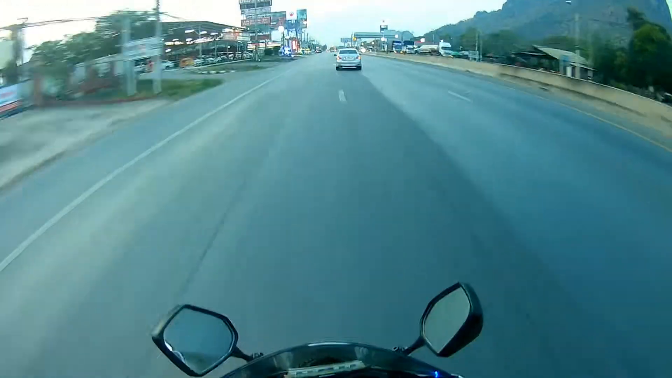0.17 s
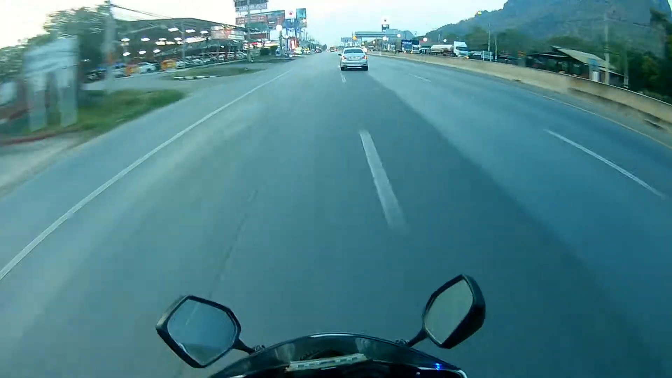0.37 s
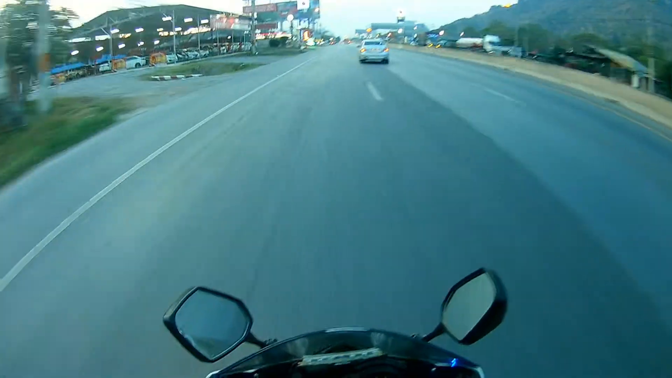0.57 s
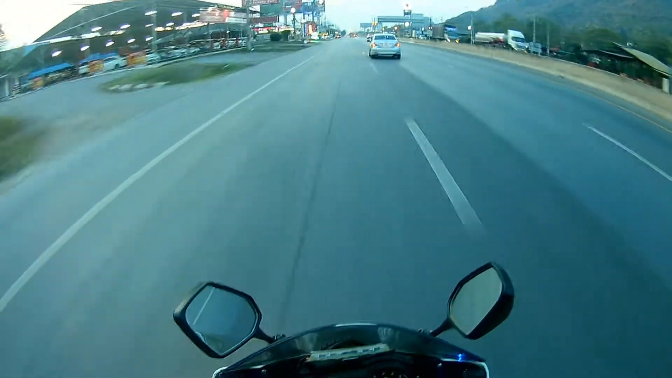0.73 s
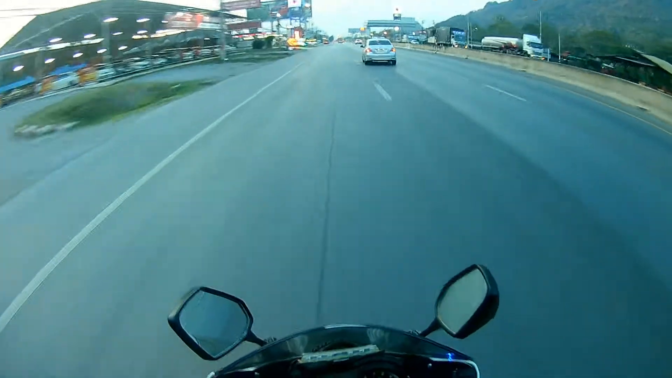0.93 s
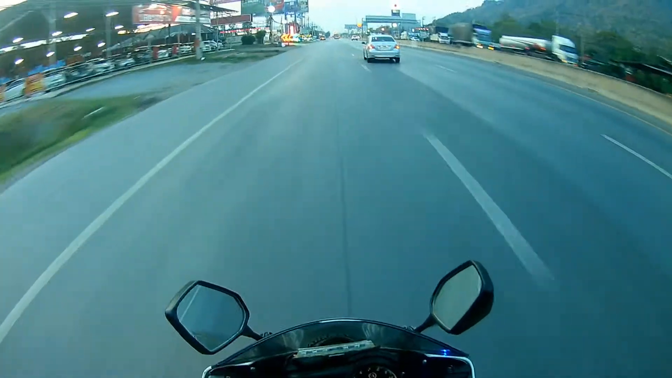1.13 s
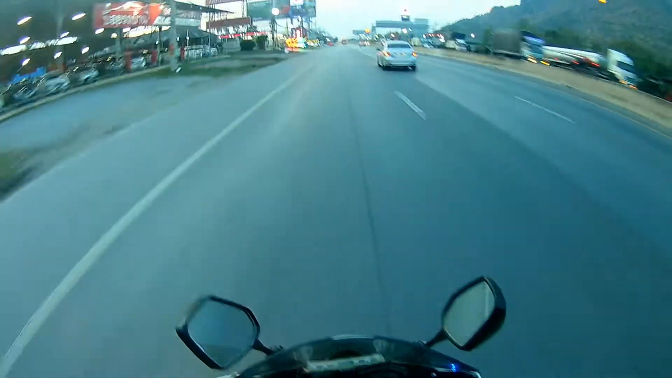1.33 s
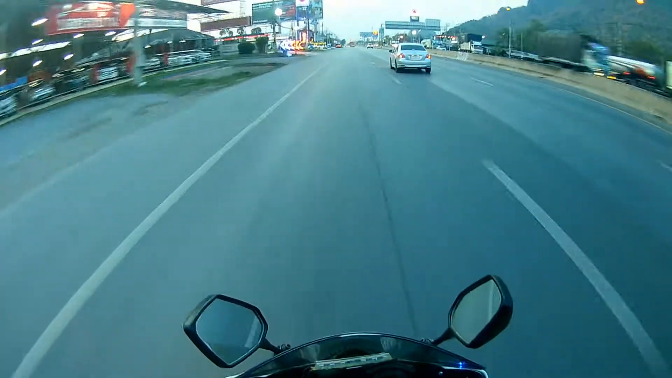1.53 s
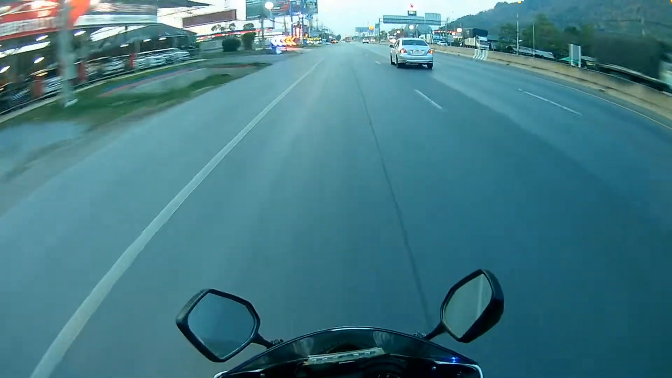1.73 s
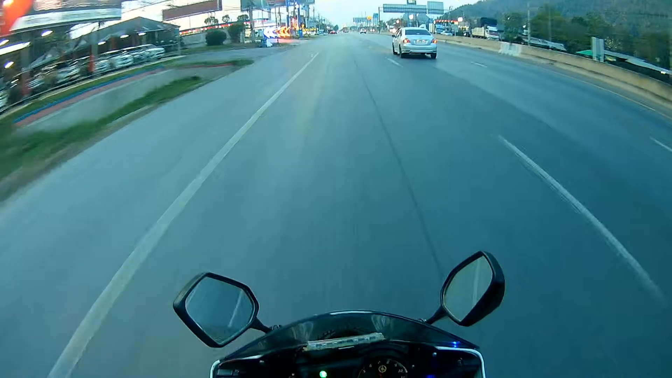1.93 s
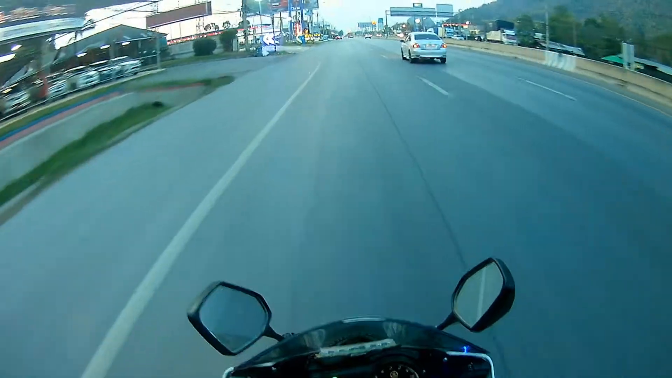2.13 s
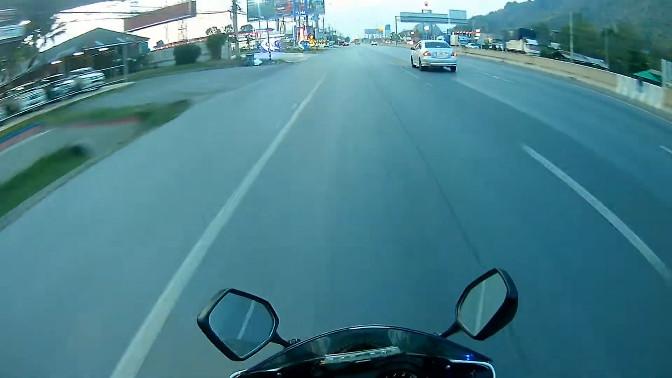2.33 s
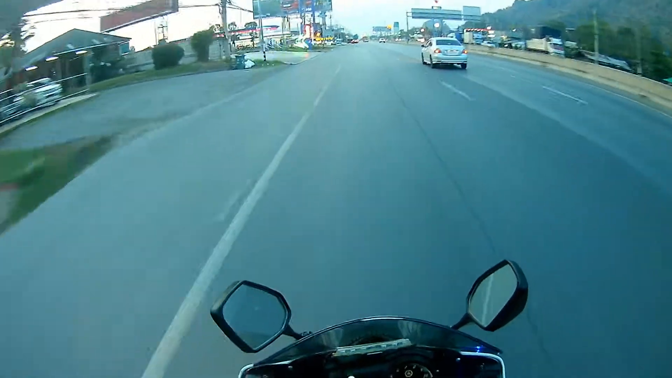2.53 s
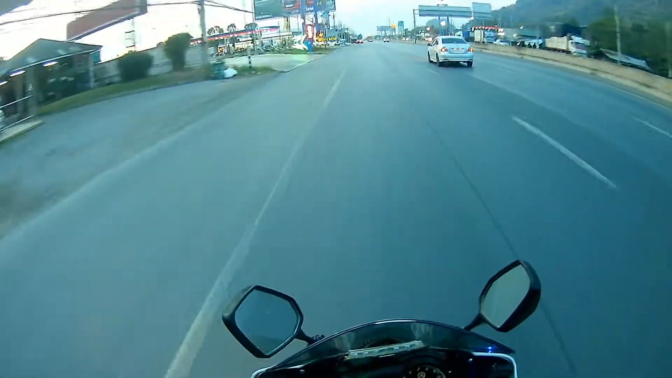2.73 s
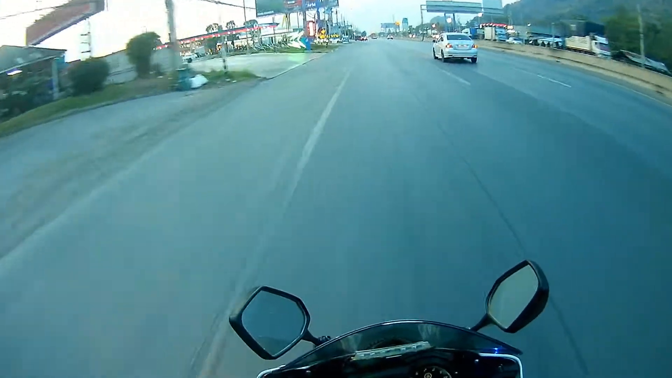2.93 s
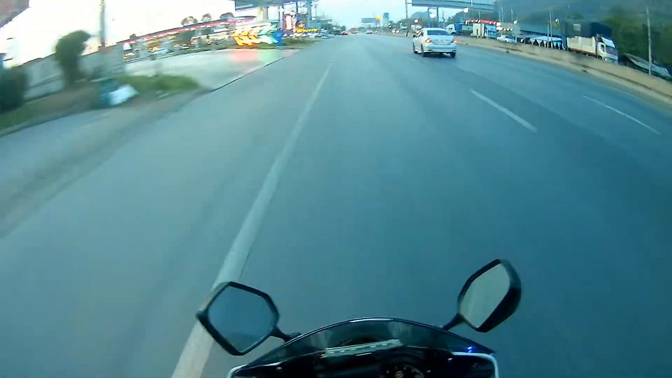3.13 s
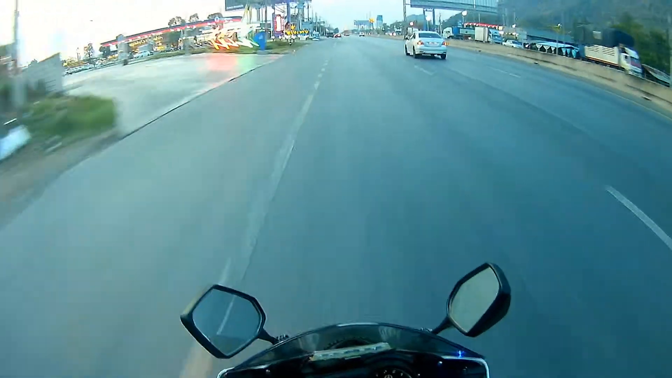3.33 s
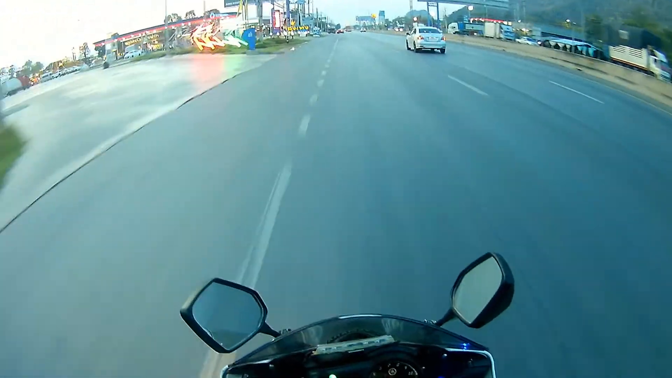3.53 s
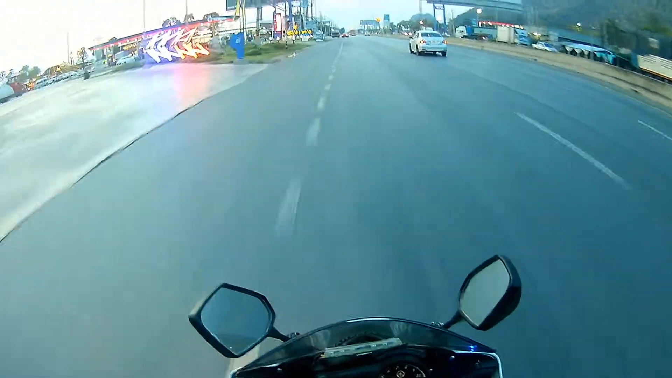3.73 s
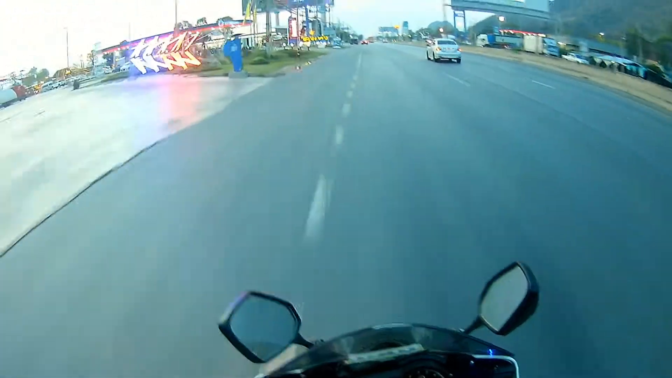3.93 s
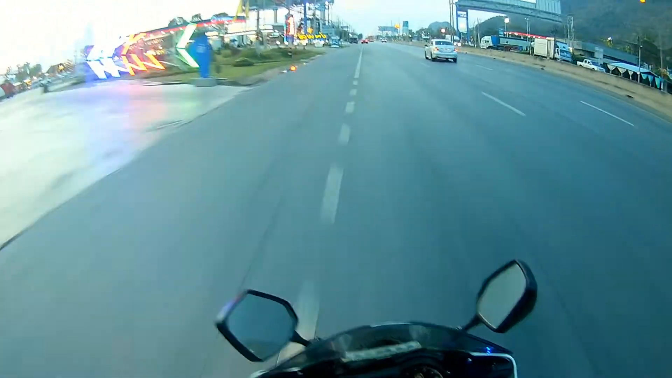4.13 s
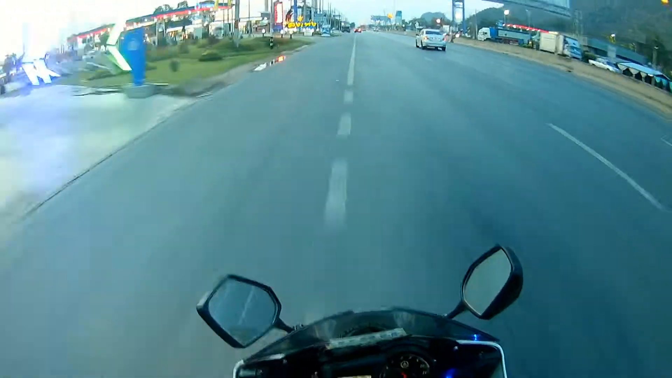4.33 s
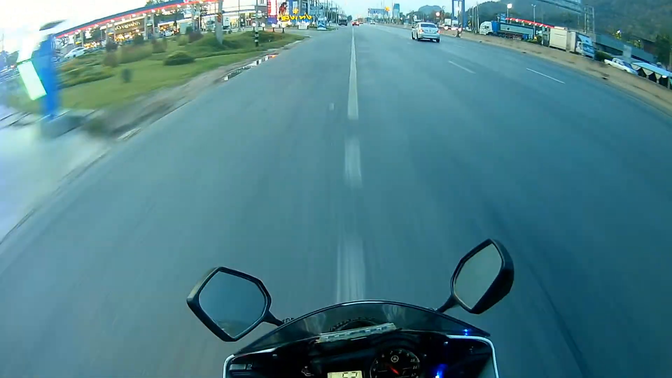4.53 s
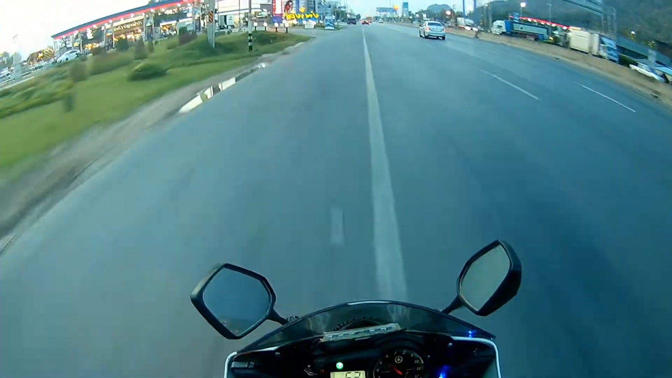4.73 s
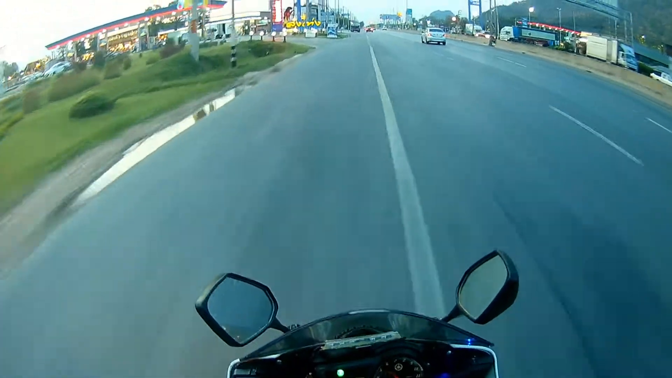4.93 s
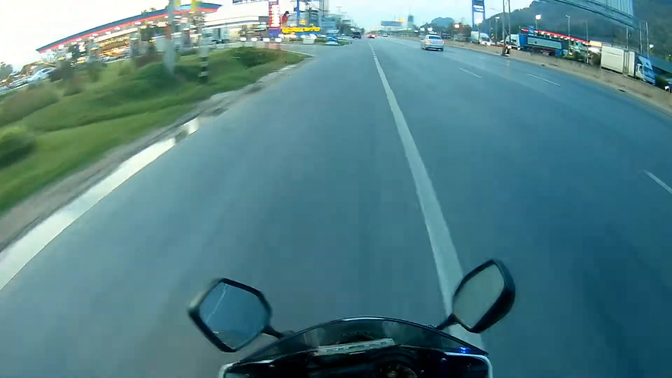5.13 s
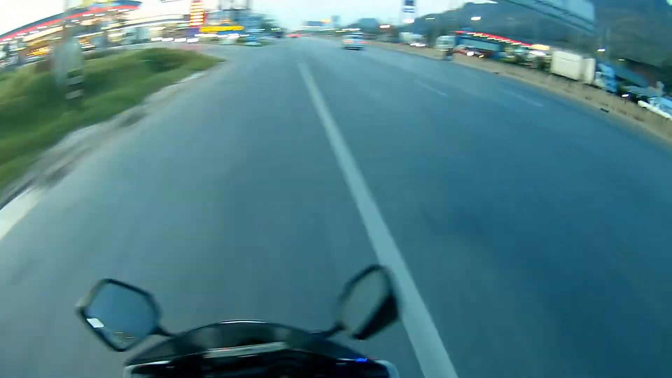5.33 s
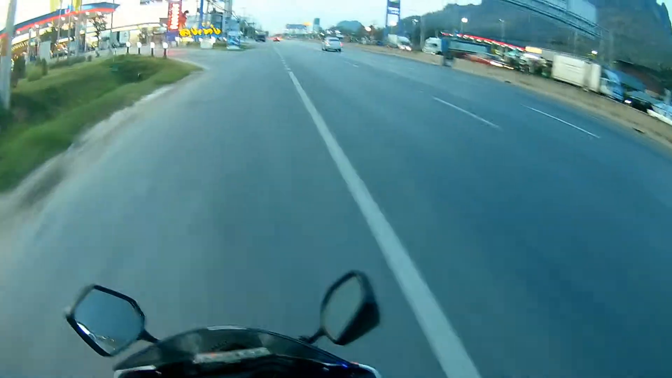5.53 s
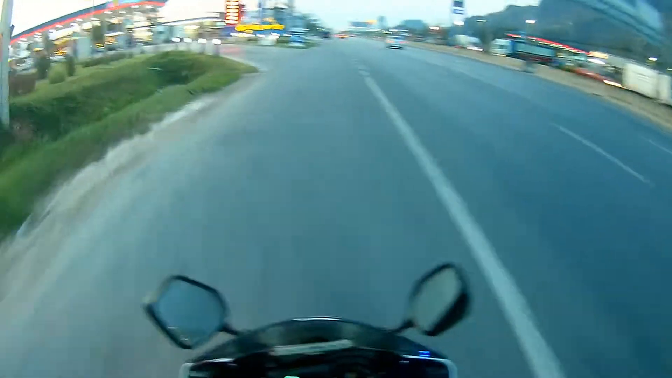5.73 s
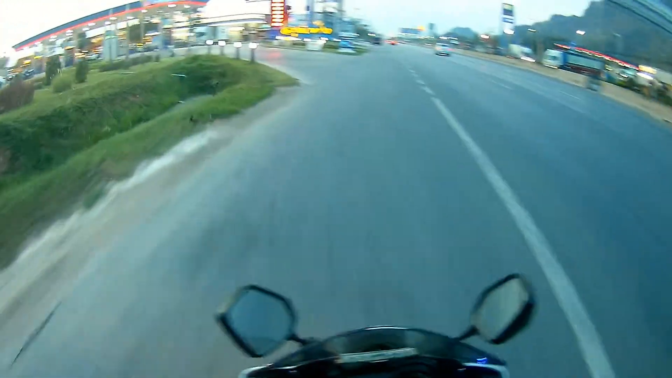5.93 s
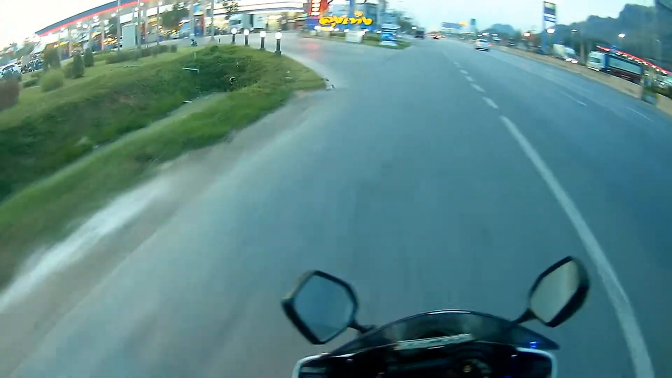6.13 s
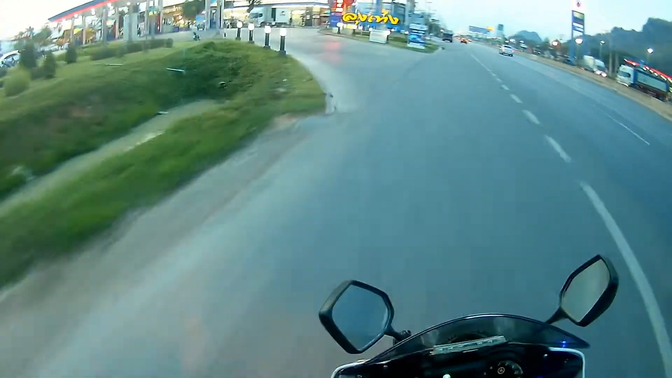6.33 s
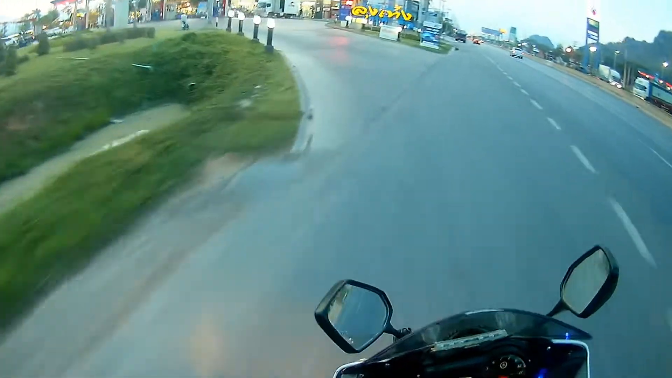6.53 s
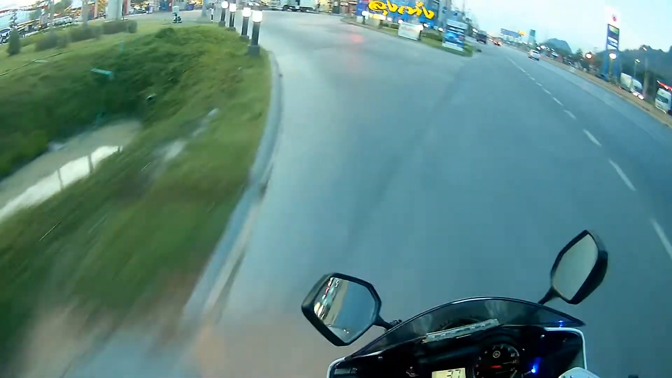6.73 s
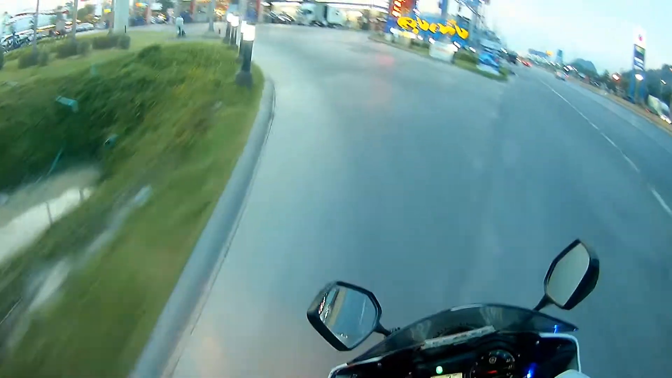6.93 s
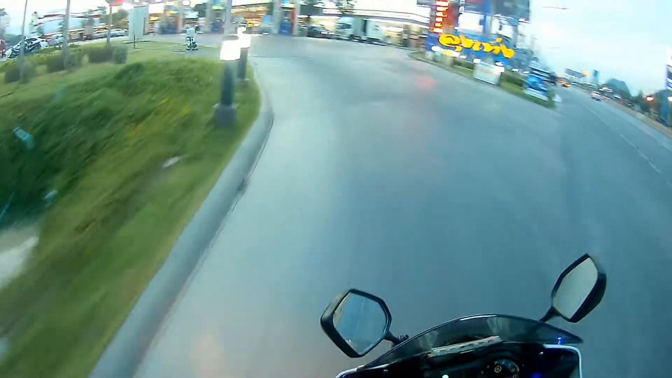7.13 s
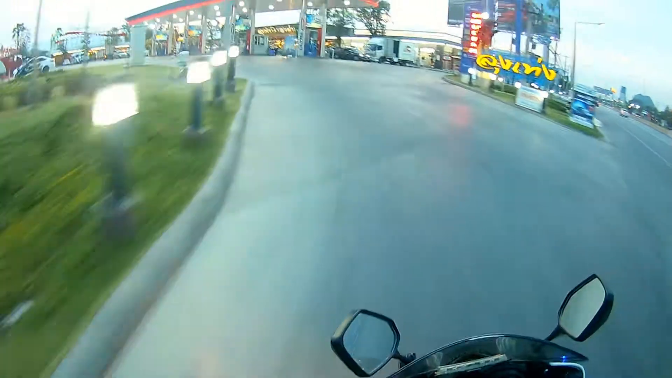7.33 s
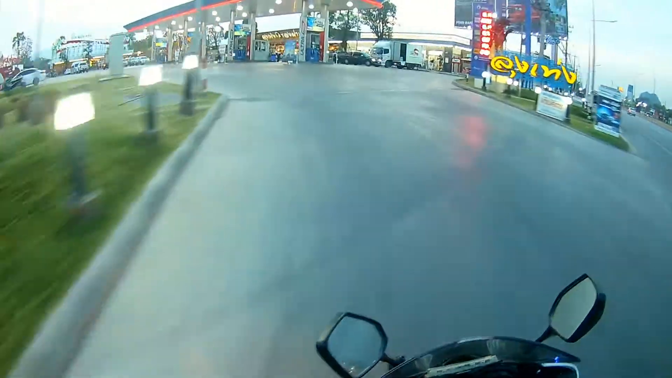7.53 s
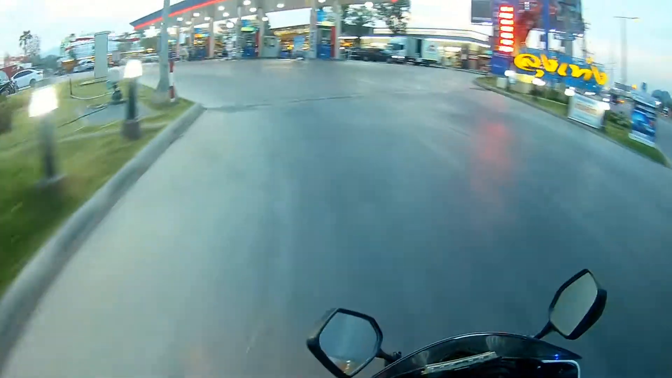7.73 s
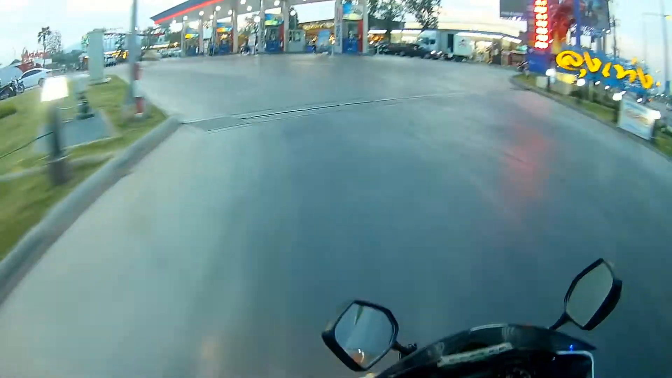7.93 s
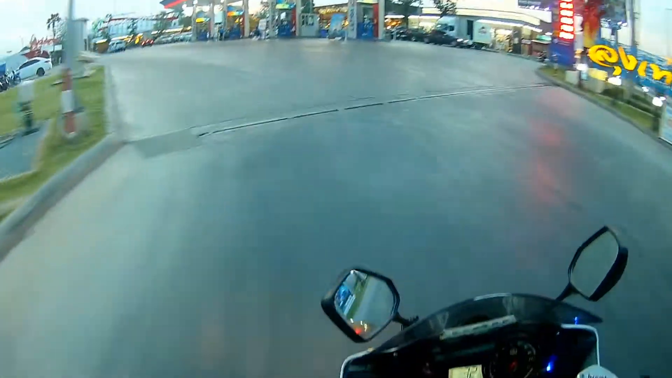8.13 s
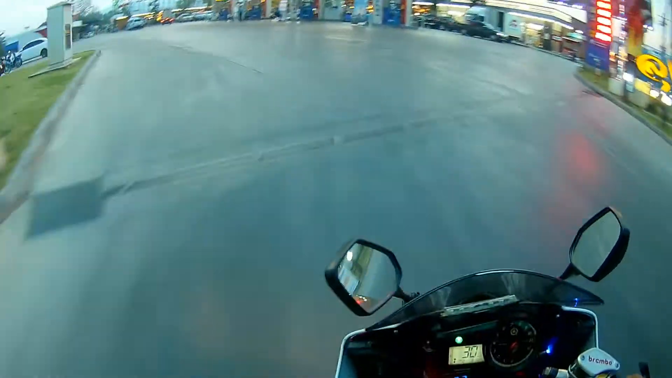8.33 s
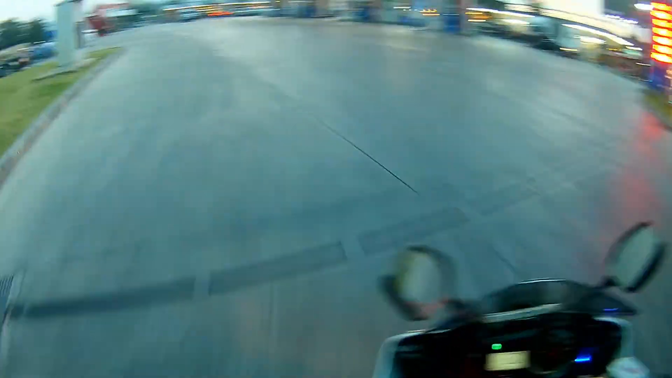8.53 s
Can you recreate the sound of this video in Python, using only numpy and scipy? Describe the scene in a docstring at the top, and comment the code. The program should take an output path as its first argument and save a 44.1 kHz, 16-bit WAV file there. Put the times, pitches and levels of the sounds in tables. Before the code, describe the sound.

A single-cylinder motorcycle decelerates on a highway, heard from a plastic-cased camera worn by the rider. Strong wind and tyre rush cover a fast exhaust drone and chain clatter. The pitch sags, jumps up at three downshifts with short rough throttle growls, and sags again. Small metallic knocks follow, the wind dies away, and the bike rolls onto a forecourt at a low, slow idle.

```python
"""A single-cylinder four-stroke motorcycle slows from highway speed, changes down three times and rolls on at idle.
Each firing strikes the resonances of the silencer and pipe, and a puff of gas noise follows it.
The intake drones at high revs, valve gear and chain clatter, and wind noise dies away with the speed.
A few short rough bursts of low noise, narrow notes and small knocks are added.
The plastic housing of a camera worn by the rider colours the clatter, the wind rush and the knocks."""
import sys
import numpy as np
from scipy import signal
from scipy.fft import rfft, irfft
from scipy.io import wavfile
from scipy.ndimage import uniform_filter1d

SR = 44100
rng = np.random.default_rng(int(sys.argv[2]) if len(sys.argv) > 2 else 0)


def generate_wav(sig):
    """Save sig (samples, or channels by samples) to the path in sys.argv[1] as 16-bit PCM at SR."""
    pcm = np.round(np.clip(np.atleast_2d(sig).T, -1, 1) * 32767).astype(np.int16)
    wavfile.write(sys.argv[1], SR, pcm)


N = 378378
TIME = np.arange(N) / SR  # seconds
SIZE = 2 ** 19  # samples in a Fourier transform, longer than the sound
FREQ = np.maximum(np.arange(SIZE // 2 + 1) * SR / SIZE, 1)  # Hz
CRUISE_HZ = 60  # firings per second at which several levels are given


def undb(db):
    """Turn decibels into gain."""
    return 10 ** (np.asarray(db) / 20)


def curve(table, at):
    """Read a table of times and values at the given times, with straight lines between its rows."""
    seconds, values = np.transpose(table)
    return np.interp(at, seconds, values)


def swell(at, middle_s, half_s):
    """A bell-shaped swell of height 1 that is down to half at half_s from its middle."""
    return .5 ** (((at - middle_s) / half_s) ** 2)


def spectrum(points):
    """Draw a spectrum in dB through the given points, on a logarithmic pitch scale."""
    hz, db = np.transpose(points)
    return np.interp(np.log(FREQ), np.log(hz), db)


def resonance(hz, width_hz):
    """A resonance with steep sides, as a spectrum in dB."""
    detune = (FREQ / hz - hz / FREQ) * hz / width_hz
    return np.maximum(-20 * np.log10(1 + detune ** 2), -100)


def colour(x, db, size=N):
    """Filter with a spectrum in dB; the result rings after a blow, never before it."""
    # folding the cepstrum onto positive times gives the minimum-phase filter
    cepstrum = irfft(np.log(undb(db)))[:SIZE // 2]
    cepstrum[1:] *= 2
    response = np.exp(rfft(cepstrum, SIZE))
    return irfft(rfft(x, SIZE) * response)[:size]


def unit(x, band=(0, SR)):
    """Scale a sound so that its rms within a band (Hz) is 1."""
    inside = rfft(x, SIZE)[(FREQ >= band[0]) & (FREQ <= band[1])]
    power = 2 * np.sum(abs(inside) ** 2) / SIZE / N
    return x / np.sqrt(power)


def walk(rate):
    """Random levels, drawn rate times a second and smoothed twice, with a spread of 1."""
    step = int(SR / rate)
    held = rng.standard_normal(2000)[np.arange(N) // step]
    slow = uniform_filter1d(uniform_filter1d(held, step), step)
    return slow / slow.std()


def clicks(times, sizes):
    """Single clicks at the given times, each shared between the two nearest samples."""
    at = np.ravel(times) * SR
    keep = (at >= 0) & (at < SIZE - 1)
    at, sizes = at[keep], np.ravel(sizes)[keep]
    before = at.astype(int)
    late = at - before
    return np.bincount(before, sizes * (1 - late), SIZE) + np.bincount(before + 1, sizes * late, SIZE)


# Resonances and dips of the camera's plastic housing.
# Each row: centre in Hz, width in Hz, height in dB (below zero for a dip).
HOUSING_RESONANCES = [(838, 102, 2), (1272, 150, 3.5), (1815, 380, 8.5), (2800, 210, 2), (2990, 420, -3),
                      (3934, 550, 8.5), (4470, 250, -3), (5027, 810, 9), (7370, 2500, 5.5),
                      (9520, 630, -39)]


def housing():
    """The plastic housing boosts some pitches and dulls others; returned as a spectrum in dB."""
    return sum(db * .5 ** ((2 * (FREQ - hz) / width) ** 2) for hz, width, db in HOUSING_RESONANCES)


# How each gear drags the revs up, holds them, then lets them sag.
# Each row: start in seconds, clutch slip in seconds, top firings per second, hold in seconds, sag in Hz per second.
GEAR_CHANGES = [(0, .05, 75.55, 0, 7.7), (2.36, .12, 63.81, .28, 19), (3.28, .42, 62.92, 0.0095, 11.8),
                (5.09, .13, 52.61, .2, 13.8)]
LOWEST_IN_GEAR_HZ = 35.8  # firings per second
# once the clutch is pulled, the revs settle towards idle and keep sinking slowly
CLUTCH_S, IDLE_HZ, SETTLE_S, IDLE_SAG_HZ_PER_S = 6.883, 22.43, .354, 3.87


def revs():
    """Firings per second: down through the gears, then a fall to idle."""
    hz = np.full(N, float(GEAR_CHANGES[0][2]))
    for start, slip_s, top_hz, hold_s, sag_hz_per_s in GEAR_CHANGES:
        since = TIME - start
        hz_before = np.interp(start, TIME, hz)
        rise = np.interp(since, [0, slip_s], [hz_before, top_hz])
        sag = sag_hz_per_s * np.maximum(since - slip_s - hold_s, 0)
        hz = np.where(since < 0, hz, rise - sag)
    free_s = np.maximum(TIME - CLUTCH_S, 0)
    settling = (LOWEST_IN_GEAR_HZ - IDLE_HZ) * np.exp(-free_s / SETTLE_S)
    idle = IDLE_HZ + settling - IDLE_SAG_HZ_PER_S * free_s
    return np.where(free_s > 0, idle, np.maximum(hz, LOWEST_IN_GEAR_HZ))


# in gear: boom fades above cruising revs, bark fades below its knee
BOOM_DB, BOOM_FADE_DB_PER_HZ = 9, 0.7
BARK_DB, BARK_KNEE_HZ, BARK_FADE_DB_PER_HZ = 9.3, 55, .55
# at idle, approached over about UNLOAD_S seconds after the clutch is pulled
IDLE_BOOM_DB, IDLE_BARK_DB, IDLE_CHUFF_DB, UNLOAD_S = 4.7, 1.6, 3.2, .2
# added at full throttle, trading boom for bark
THROTTLE_BOOM_DB, THROTTLE_BARK_DB = -4.5, 8


def strengths(times, hz):
    """Boom, bark and chuff of each firing in dB: revs and throttle favour the bark, idling the deep chuff."""
    idling = 1 - np.exp(-np.maximum(times - CLUTCH_S, 0) ** 2 / UNLOAD_S ** 2)
    throttle = sum(opening * swell(times, s, half_s) for s, half_s, _, _, opening in ROUGH_BURSTS)
    boom_db = BOOM_DB - BOOM_FADE_DB_PER_HZ * np.maximum(hz - CRUISE_HZ, 0)
    boom_db = boom_db + idling * (IDLE_BOOM_DB - boom_db) + THROTTLE_BOOM_DB * throttle
    bark_db = BARK_DB - BARK_FADE_DB_PER_HZ * np.maximum(BARK_KNEE_HZ - hz, 0)
    bark_db = bark_db + idling * (IDLE_BARK_DB - bark_db) + THROTTLE_BARK_DB * throttle
    chuff_db = IDLE_CHUFF_DB + 20 * np.log10(np.maximum(idling, .2))
    return boom_db, bark_db, chuff_db


def stumble(number, times, from_s=7.28, to_s=7.76, poor_db=4.5, rebound_db=.8):
    """On the way down to idle every second charge burns poorly and the next strongly; dB of weakening."""
    return np.where(number % 2, poor_db, -rebound_db) * ((times > from_s) & (times < to_s))


# Spectrum of the silencer, which booms near 160 Hz. Each row: pitch in Hz, level in dB.
SILENCER_SPECTRUM = [(5, -66), (25, -27), (50, -24), (72, -13.5), (100, -9.5), (128, -5.5), (156, 2.5),
                     (172, -0.5), (190, -5.5), (225, -19.5), (280, -52), (530, -45), (850, -52),
                     (2000, -57), (5000, -100)]
# Heat of the exhaust gas, rising for the first few seconds and then falling.
# Each row: time in seconds, relative speed of sound (a plain factor).
GAS_HEAT = [(0, 0.93), (1.4, 1.01), (3.2, 1.066), (4.3, 1.05), (5.6, 1.021), (8.58, 0.97)]
BARK_HZ, BARK_WIDTH_HZ = 350, 56
CHUFF_HZ, CHUFF_WIDTH_HZ = 95, 48
SCATTER_DB = 0.23  # basic unevenness between firings


def exhaust(number, times, hz, jitter_s_per_db=.00005, bark_scatter=1.3):
    """Each firing strikes three pipe sounds: the silencer's boom, a higher bark and a deep chuff."""
    boom_db, bark_db, chuff_db = strengths(times, np.interp(times, TIME, hz))
    weak_db = stumble(number, times)
    chance = np.clip(rng.standard_normal((len(times), 3)).T, -2, 2)
    # each firing comes a little early or late
    times = times + jitter_s_per_db * SCATTER_DB * chance[0]
    # in hot gas the pipe's own clock runs faster, which lifts all its resonances
    clock = np.cumsum(curve(GAS_HEAT, TIME)) / SR
    times = np.interp(times, TIME, clock, left=-1)
    burn_db = SCATTER_DB * chance[1] - weak_db
    bark_uneven_db = bark_scatter * SCATTER_DB * (chance[1] + chance[2]) / 2
    boom = clicks(times, undb(boom_db + burn_db))
    chuff = clicks(times, undb(chuff_db + burn_db))
    bark = clicks(times, undb(bark_db - 2 * weak_db + bark_uneven_db))
    pipe = colour(boom, spectrum(SILENCER_SPECTRUM), size=SIZE)
    pipe += colour(chuff, resonance(CHUFF_HZ, CHUFF_WIDTH_HZ), size=SIZE)
    pipe += colour(bark, resonance(BARK_HZ, BARK_WIDTH_HZ), size=SIZE)
    # back from the pipe's clock to ordinary time
    return np.interp(clock * SR, np.arange(SIZE), pipe)


# Spectrum of the gas puffing from the tailpipe. Each row: pitch in Hz, level in dB.
PUFF_SPECTRUM = [(40, -31.5), (130, 10.5), (280, -1.5), (420, -11), (600, -5), (900, -20), (3000, -50.5)]


def puffs(cycle, hz, level_db=-54, db_per_octave=3, decay_s=0.054):
    """A short puff of turbulent gas follows each firing, so no two putts are alike."""
    since_firing_s = (cycle % 1) / hz
    gas = rng.standard_normal(N) * np.exp(-since_firing_s / decay_s)
    puff_db = level_db + db_per_octave * np.log2(hz / CRUISE_HZ)
    return unit(colour(gas, spectrum(PUFF_SPECTRUM))) * undb(puff_db)


def intake(cycle, number, hz, lag_cycles=0.325, scatter_db=2, floor_db=-22, full_db=4.5):
    """The piston gulps air a little after each firing and rings the airbox, which drones only at high revs."""
    times = np.interp(number + lag_cycles, cycle, TIME, left=-1, right=-1)
    above_cruise_hz = np.interp(times, TIME, hz) - CRUISE_HZ
    gulp_db = np.clip(4.5 + 1.3 * above_cruise_hz, floor_db, full_db)  # dB, dB per Hz
    gulp_db = gulp_db + scatter_db * rng.standard_normal(len(times))
    return colour(clicks(times, undb(gulp_db)), resonance(258, 62))  # Hz, width in Hz


# Spectrum of the valve gear and chain. Each row: pitch in Hz, level in dB.
MACHINERY_SPECTRUM = [(100, -29), (400, -16), (750, -2.5), (1130, 2.5), (1500, 7), (1800, -2), (2200, -6.5),
                      (2700, -13), (3200, -22), (4400, -67), (5800, -35.5), (7300, -26.5), (10500, -51.5),
                      (15000, -48)]


def machinery(cycle, number, hz, level_db=-46, db_per_octave=10, scatter_db=3, chain_db=3, throb_db=1.0, count=36):
    """Valves and gear teeth strike at the same crank angles in every cycle; the chain rustles between them."""
    angle, weight = rng.random(count), rng.standard_normal(count)
    times = np.interp(number[:, None] + angle, cycle, TIME, left=-1, right=-1)
    sizes = np.tanh(2 * weight) * undb(scatter_db * rng.standard_normal(times.shape))
    # smaller taps when they come faster, so that the revs alone add no power here
    taps = clicks(times, sizes / np.sqrt(np.interp(times, TIME, hz)))[:N]
    # the chain is tugged once each crank turn, two turns to a firing
    tug_db = throb_db * np.sin(2 * np.pi * 2 * cycle)
    chain = rng.standard_normal(N) * undb(tug_db + 2.0 * walk(45))
    mixed = unit(taps) + undb(chain_db) * unit(chain)
    clatter = colour(mixed, spectrum(MACHINERY_SPECTRUM) + housing())
    clatter = unit(clatter, band=(1100, 2000))
    return clatter * undb(level_db + db_per_octave * np.log2(hz / CRUISE_HZ))


def valve_cover(cycle, hz, level_db=-54, throb_db=3, db_per_octave=6.5):
    """Fine valve rattle rings the cover, swelling after each firing and growing with the revs."""
    rattle = rng.standard_normal(N) * undb(throb_db * np.sin(2 * np.pi * cycle))
    ring = unit(colour(rattle, resonance(1685, 280)))  # Hz, width in Hz
    return ring * undb(level_db + db_per_octave * np.log2(hz / CRUISE_HZ))


# Large eddies that lift the buffeting. Each row: middle in seconds, half length in seconds, lift in dB.
EDDY_GUSTS = [(.13, .1, 6.5), (1.04, 0.042, 13), (1.332, 0.057, 17.5), (5.2, .2, 3), (7.15, .2, 5),
              (8.4, 0.43, 11)]


def buffeting(rush_db, start_db=-48, follow=0.78):
    """Level of the buffeting in dB: it fades more slowly than the rush and swells in gusts."""
    gusts_db = sum(db * swell(TIME, s, half_s) for s, half_s, db in EDDY_GUSTS)
    return start_db + follow * (rush_db - rush_db[0]) + gusts_db


# Wind rush falling with road speed. Each row: time in seconds, level in dB before a small trim.
WIND_LEVEL = [(0.0, -36), (0.26, -37.5), (1.55, -41.5), (6.66, -61), (7.79, -70), (8.58, -71)]
# Spectrum of the rush of air and tyres. Each row: pitch in Hz, level in dB.
RUSH_SPECTRUM = [(20, -13.5), (70, -0.5), (120, -1), (200, -1.5), (330, -1.5), (700, -3.5), (1000, -5.5),
                 (1800, -8), (2500, -8.5), (3200, -21), (4400, -24.5), (5800, -34), (10500, -49.5),
                 (15000, -67)]
# Spectrum of the low buffeting. Each row: pitch in Hz, level in dB.
BUFFET_SPECTRUM = [(10, -10), (25, 5.5), (55, 17), (80, 7), (130, -5.5), (300, -28), (2000, -71)]


def wind(flutter_db=0.52, gust_db=3.0, rush_trim_db=-0.26):
    """Air and tyres rush past the housing while large eddies thud against it: two unsteady noises."""
    rush_db = curve(WIND_LEVEL, TIME)
    flutter = rng.standard_normal(N) * undb(flutter_db * walk(70))
    rush = unit(colour(flutter, spectrum(RUSH_SPECTRUM) + housing()), band=(500, 1000))
    thuds = rng.standard_normal(N) * undb(gust_db * walk(16))
    buffet = unit(colour(thuds, spectrum(BUFFET_SPECTRUM)), band=(20, 55))
    return rush * undb(rush_db + rush_trim_db) + buffet * undb(buffeting(rush_db))


# Two hoots in the wind at speed, then a faint rubbing under braking.
# Each row: start in seconds, end in seconds, pitch in Hz, width in Hz, level in dB.
NARROW_NOTES = [(0, 1.85, 462, 11.5, -48.5), (0, 3.3, 840, 67, -53), (5.7, 7.6, 1163, 270, -58.5)]


def tones(fade_s=0.08):
    """Narrow, wavering notes, each made by passing noise through one resonance."""
    out = 0
    for start, end, hz, width_hz, db in NARROW_NOTES:
        note = unit(colour(rng.standard_normal(N), resonance(hz, width_hz)))
        fade = np.clip(np.minimum(TIME - start, end - TIME) / fade_s, 0, 1)
        out = out + note * undb(db) * fade
    return out


# Short rough bursts of low noise, most of them with a touch of throttle, which also shapes the firings.
# Each row: middle in seconds, half length in seconds, level in dB, centre in Hz, throttle from 0 to 1.
ROUGH_BURSTS = [(2.47, .035, -51, 380, .3), (3.063, .037, -44, 270, 0), (3.416, .031, -53, 400, .1),
                (5.16, .046, -48, 380, .9), (7.235, .03, -52, 170, .3)]


def bursts(width_hz=130):
    """Short rough bursts: low noise passed through a resonance, swelling and fading."""
    out = 0
    for s, half_s, db, hz, _ in ROUGH_BURSTS:
        roar = unit(colour(rng.standard_normal(N), resonance(hz, width_hz)))
        out = out + roar * undb(db) * swell(TIME, s, half_s)
    return out


# Small knocks of gearbox and chassis. Each row: time in seconds, peak level in dB.
KNOCK_TIMES = [(4.793, -34.5), (5.288, -38.5), (6.659, -36), (7.099, -41)]
# Spectrum of the ring they share. Each row: pitch in Hz, level in dB.
KNOCK_SPECTRUM = [(200, -25), (800, -12), (1250, 0), (1600, -8), (3000, -18), (9000, -48), (15000, -70)]


def knocks():
    """Short metallic knocks: single clicks that share one ring."""
    s, db = np.transpose(KNOCK_TIMES)
    rings = colour(clicks(s, undb(db)), spectrum(KNOCK_SPECTRUM) + housing())
    return rings * undb(db.max()) / abs(rings).max()


def scene():
    """The revs time every firing and help set its strength; the wind follows its own falling curve."""
    hz = revs()
    # count engine cycles so that the clutch is pulled exactly on a firing
    cycle = np.cumsum(hz) / SR
    cycle = cycle - np.interp(CLUTCH_S, TIME, cycle)
    number = np.arange(np.floor(cycle[0]), np.ceil(cycle[-1]))
    firings = np.interp(number, cycle, TIME, left=-1)
    engine = exhaust(number, firings, hz) + puffs(cycle, hz)
    engine = engine + intake(cycle, number, hz) + machinery(cycle, number, hz) + valve_cover(cycle, hz)
    air = wind() + tones()
    return (engine + air + bursts() + knocks())[None]


def record(dry, hiss_db=-82, top_hz=15500):
    """The camera adds faint hiss and cuts the top with a steep filter."""
    hiss = undb(hiss_db) * rng.standard_normal(dry.shape)
    top_cut = signal.ellip(10, .1, 70, top_hz, fs=SR, output="sos")
    return signal.sosfilt(top_cut, dry + hiss)


dry = scene()
out = record(dry)
generate_wav(out)
```